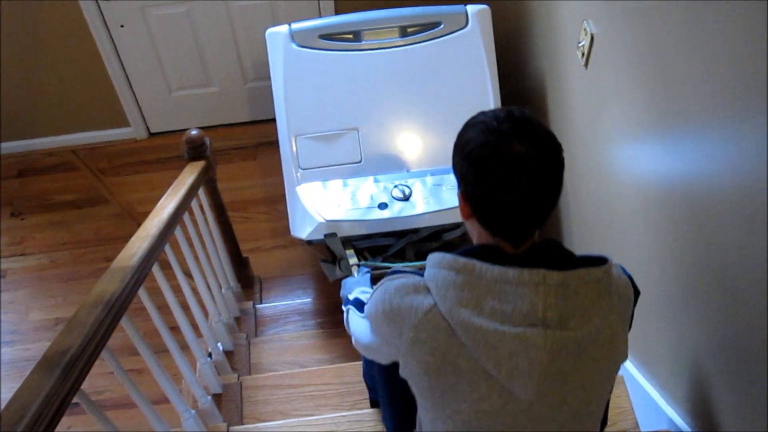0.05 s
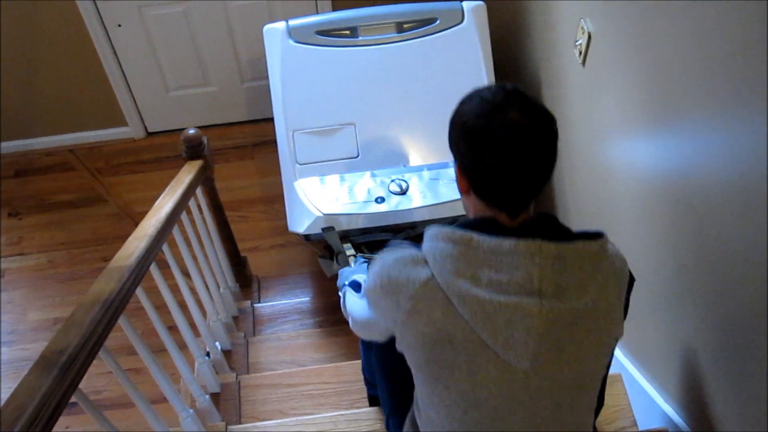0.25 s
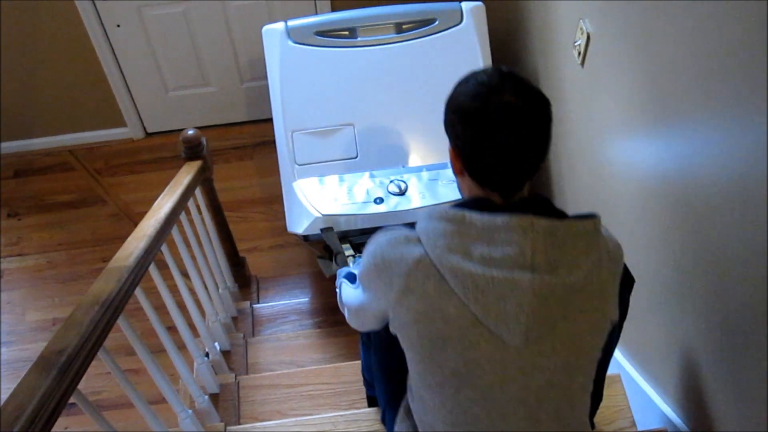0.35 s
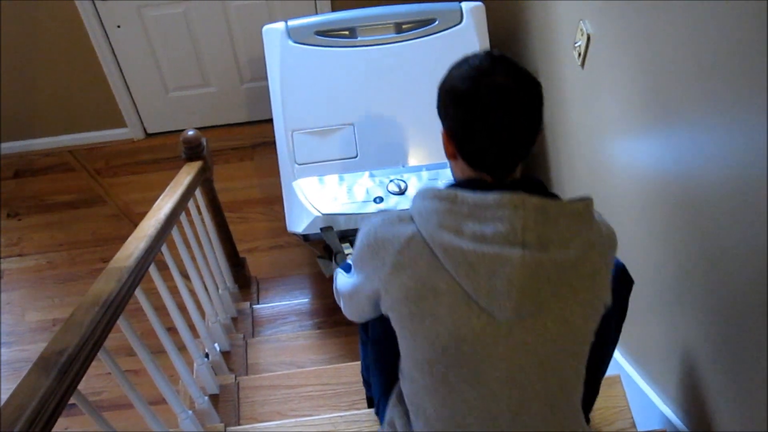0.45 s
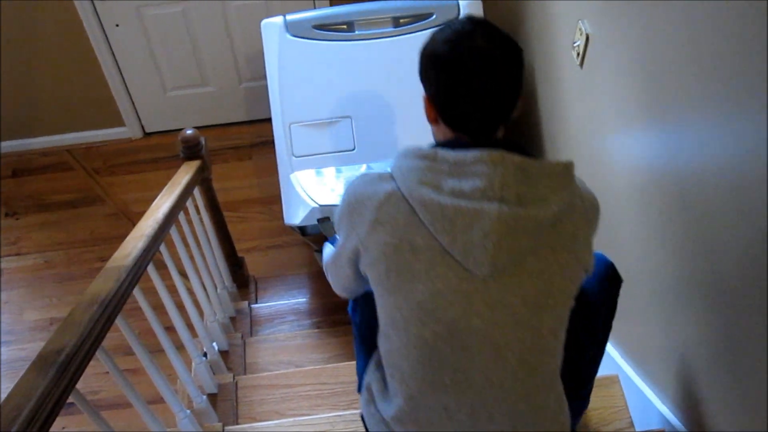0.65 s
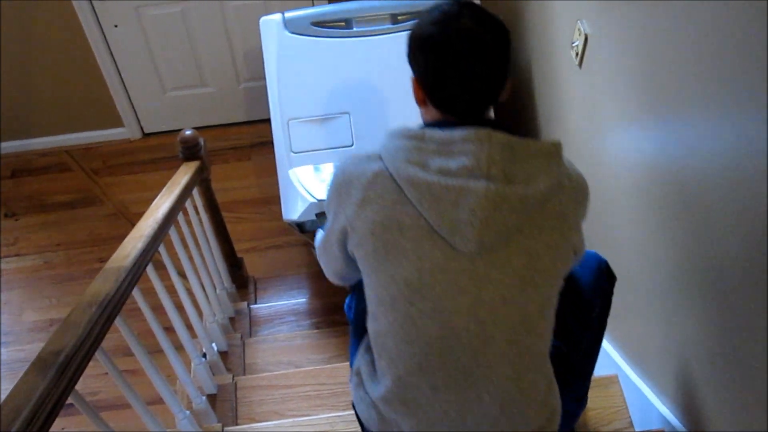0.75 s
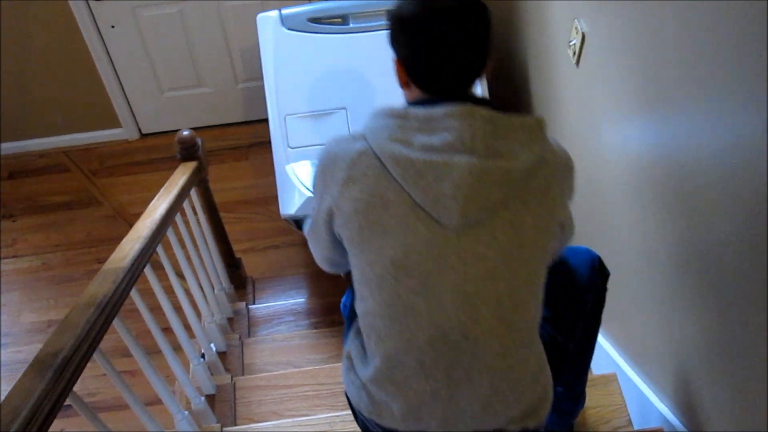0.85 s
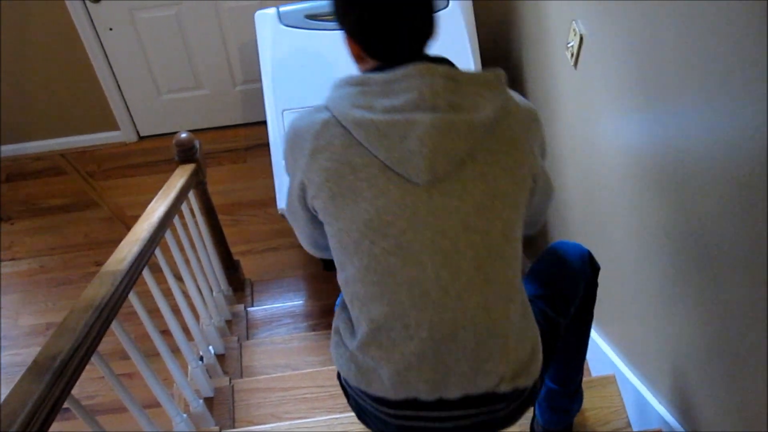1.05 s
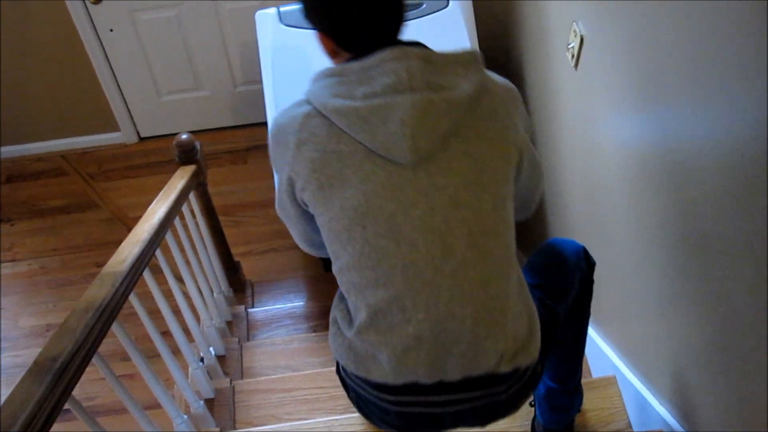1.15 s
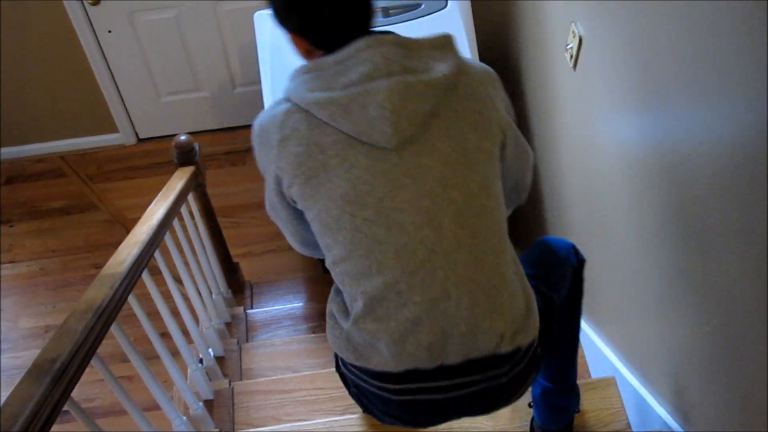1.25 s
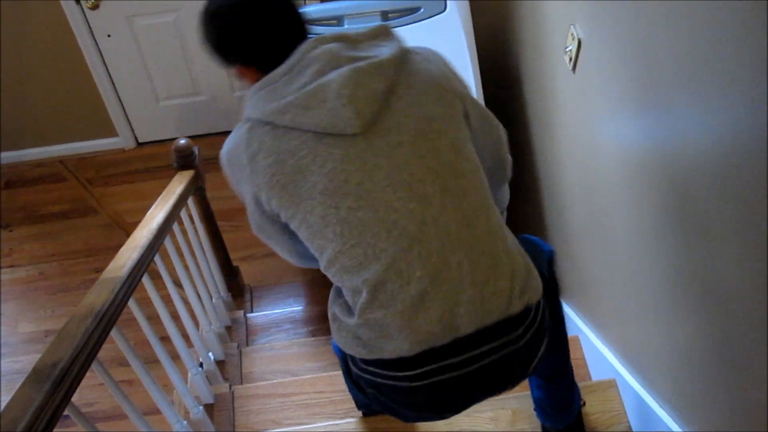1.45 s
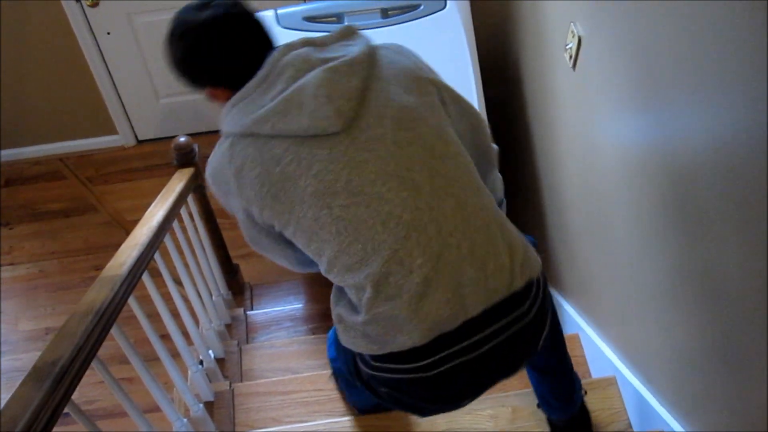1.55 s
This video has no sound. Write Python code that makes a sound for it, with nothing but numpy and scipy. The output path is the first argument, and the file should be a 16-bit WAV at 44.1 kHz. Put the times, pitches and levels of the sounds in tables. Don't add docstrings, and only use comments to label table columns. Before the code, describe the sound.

A heavy metal appliance drops onto a wooden stair with a booming thump and clatter

```python
import sys
import numpy as np
from scipy import signal
from scipy.fft import rfft, irfft
from scipy.io import wavfile

SR = 44100
rng = np.random.default_rng(int(sys.argv[2]) if len(sys.argv) > 2 else 0)


def boost_factor(decibels):
    exponent = np.asarray(decibels, float) / 20
    return 10 ** exponent


def to_wav(s):
    ch = np.atleast_2d(s).T
    pcm = np.round(np.clip(ch, -1, 1) * 32767)
    wavfile.write(sys.argv[1], SR, pcm.astype(np.int16))


N = 70560


def rms_one(x):
    return x / np.sqrt(np.mean(x ** 2) + 1e-20)


def in_time(rows):
    return boost_factor(np.interp(np.arange(N) / SR, *np.transpose(rows)))


def at_hz(points, hz):
    points = np.array(points)
    return np.interp(np.log(hz + 1), np.log(points[:, 0]), points[:, 1])


def butter_filter(x, order, hz, kind="low"):
    return signal.sosfilt(signal.butter(order, hz, kind, fs=SR, output="sos"), x)


def colour(x, spectrum):
    size = 2 ** 17
    hz = np.arange(size // 2 + 1) * SR / size
    slope = 18 * np.minimum(np.log2((hz + 1) / spectrum[0][0]), 0)
    cepstrum = irfft(np.log(boost_factor(at_hz(spectrum, hz) + slope)))
    cepstrum[1:size // 2] *= 2
    cepstrum[size // 2 + 1:] = 0
    return irfft(rfft(x, size) * np.exp(rfft(cepstrum)))[:N]


def drift(rate):
    r = np.exp(-2 * np.pi * rate / SR)
    wander = signal.lfilter([1], [1, -2 * r, r * r], rng.standard_normal(N + SR))
    return rms_one(wander[SR:])


def ring(clicks, hz, t60):
    r = boost_factor(-60 / (t60 * SR))
    w = 2 * np.pi * hz / SR
    return signal.lfilter([0, np.sin(w)], [1, -2 * r * np.cos(w), r * r], clicks + 1e-18)


def fade(starts, t60):
    return signal.lfilter([1], [1, -boost_factor(-60 / (t60 * SR))], starts)


def grains(per_s, spread_db):
    happens = rng.random(N) < per_s / SR
    size = boost_factor(spread_db * np.minimum(rng.exponential(1, N), 4))
    return happens * size * rng.choice([-1, 1], N)


def chatter(column, per_s, t60, soft_hz):
    # start in seconds, tread thud in dB, panel boom in dB, frame clatter in dB.
    blows = np.array([(0.072, -65, -60, -39), (0.2043, -11, -22, -29), (0.2108, -8, -12, -12.5),
                      (0.229, -12.5, -12, -21.5), (0.245, -13, -21, -26), (0.261, -5.5, -18.5, -23.5),
                      (0.282, -13, -15, -28), (0.293, -40, -24.5, -26), (0.31, -25.5, -12, -28.5),
                      (0.339, -17, -18, -33.5), (0.353, -22, -21.5, -38), (0.395, -35, -21, -55),
                      (0.432, -34, -34, -44), (0.469, -48, -22, -50), (0.518, -45, -29, -61),
                      (0.656, -35, -29, -58), (0.699, -46.5, -31.5, -65), (.726, -30, -30.5, -41),
                      (0.753, -46, -41.5, -41.5), (0.939, -33, -44, -66), (.959, -32, -31, -45),
                      (0.986, -37, -40.5, -51), (1.01, -47, -38, -63), (1.069, -48, -47, -54),
                      (1.38, -65, -56, -65), (1.440, -57, -65, -74)])
    rise = 0.0013 * SR
    starts = np.zeros(N)
    starts[(blows[:, 0] * SR).astype(int)] = boost_factor(blows[:, column])
    envelope = fade(starts + 1e-18, t60)
    envelope = signal.lfilter([1 / rise], [1, 1 / rise - 1], envelope)
    touches = (rng.random(N) < per_s / SR) * rng.standard_normal(N) * envelope
    return butter_filter(touches, 2, min(soft_hz, .4 * SR)) / np.sqrt(per_s * t60 / 14 + 1)


def body(force, modes):
    out = 0
    flips = rng.choice([-1, 1], (len(modes), N // 256 + 1))
    flips = np.repeat(flips, 256, axis=1)[:, :N]
    for flip, (hz, db, t60) in zip(flips, modes):
        out = out + boost_factor(db) * ring(force * flip, hz, t60)
    return out


def room_tone():
    # frequency in Hz, level in dB per Hz.
    room = [(30, -14), (66, 0.5), (105, -11), (150, -5), (330, -5.5), (1900, -14), (9000, -28),
            (15500, -34.5)]
    # frequency in Hz, level in dB.
    whine_lines = [(1863, -61.5), (1895, -63), (2439, -63.5), (2466, -72)]
    tick_start_s, ticks_per_s, tick_db, tick_t60_s = .0237, 29.97, -53, .022
    hiss = boost_factor(-47 + 0.77 * drift(4.9)) * rms_one(colour(rng.standard_normal(N), room))
    whine = sum(boost_factor(db) * rms_one(ring(rng.standard_normal(N), hz, 0.41)) for hz, db in whine_lines)
    beats = np.zeros(N)
    times = np.arange(tick_start_s, N / SR - .001, 1 / ticks_per_s)
    beats[(times * SR).astype(int)] = 1
    puffs = fade(beats, tick_t60_s) * rng.standard_normal(N)
    return hiss + whine + boost_factor(tick_db) * butter_filter(puffs, 2, 9500, "high")


def rustle():
    # frequency in Hz, level in dB per Hz.
    cloth = [(1200, -14), (2500, -3), (5000, 2), (11000, -1.5), (15500, -18)]
    # time in seconds, level in dB.
    cloth_level = [(1.0, -72), (1.3, -68), (1.5, -62), (1.56, -52), (1.6, -50)]
    rub = grains(12000, 2.5) * boost_factor(1.5 * drift(20))
    return in_time(cloth_level) * rms_one(colour(rub, cloth))


def drag():
    # frequency in Hz, level in dB per Hz.
    scrape = [(110, -10), (180, -8.5), (290, 0.5), (480, -7.5), (1000, -5.5), (2500, -7), (7300, -21),
              (15000, -43)]
    # time in seconds, level in dB.
    scrape_level = [(0, -34.5), (.1, -38.5), (.19, -38), (.4, -35.5), (.8, -56.5)]
    # frequency in Hz, width in Hz, level in dB.
    truck = [(296, 170, -6), (1030, 260, 5.5), (2610, 130, 6), (3500, 330, 2)]
    rub = grains(9000, 2.5) * boost_factor(.3 * drift(25))
    rings = sum(boost_factor(db) * rms_one(ring(rub, hz, 1.5 / width)) for hz, width, db in truck)
    mix = rms_one(colour(rub, scrape)) + boost_factor(-7.5) * rms_one(rings)
    return in_time(scrape_level) * rms_one(mix)


def stairwell(x):
    # frequency in Hz, time to fall by 60 dB in seconds.
    decay = [(60, 0.53), (170, 0.58), (400, 1.04), (1000, 1.41), (2500, 1.18), (5000, 0.77), (9000, 0.34),
             (14000, 0.36)]
    build_up_s = 0.0057
    t = np.arange(N) / SR
    edges = 35 * 2 ** np.arange(0, 9.1, .5)
    white = rng.standard_normal((2, N))
    echo = 0
    for k, (low, high) in enumerate(zip(edges, edges[1:])):
        t60 = at_hz(decay, np.sqrt(low * high))
        band = butter_filter(white[k % 2], 2, [low, high], "band")
        echo = echo + band * boost_factor(-60 * t / t60) * np.sqrt(14 / t60 / SR)
    return signal.fftconvolve(x, echo * (1 - np.exp(-t / build_up_s)))[:N]


def flicks():
    # start in seconds, level in dB, centre frequency in Hz.
    strap_hits = [
        (.074, -33, 6540),
        (.211, -34.5, 12400),
        (.296, -32, 11000),
        (.727, -47, 8530),
        (.756, -48, 7000),
        (1.105, -41, 3400),
        (1.135, -43, 3470),
        (1.165, -51, 3400),
    ]
    t60_s = .045
    t, out = np.arange(N) / SR, 0
    for s, db, hz in strap_hits:
        age = np.maximum(t - s, 0)
        puff = (t > s) * boost_factor(db - 60 * age / t60_s) * rng.standard_normal(N)
        out = out + butter_filter(puff + 1e-18, 2, [0.55 * hz, min(1.18 * hz, .45 * SR)], "band")
    return out


def tread():
    # frequency in Hz, level in dB, time to fall by 60 dB in seconds.
    wood = [(148, -4, 0.12), (162.8, 0, 0.11), (183.2, -3, 0.12), (226, -3.5, 0.12), (244, -10.5, 0.17),
            (299, -3.5, 0.077)]
    # start in seconds, frequency in Hz, level in dB, time to fall by 60 dB in seconds.
    pushes = [(0.21, 54, -8, .11), (.285, 62, -33, 0.23), (.41, 52, -45, 0.12), (.204, 187, -10.5, .17),
              (0.22, 164, -14, .13), (0.29, 180, -16.5, 0.12), (0.38, 150, -27, 0.24),
              (.262, 420, -14, 0.12), (.305, 500, -15, 0.317), (1.2, 490, -37, 0.073), (.64, 153, -36, 0.2),
              (.96, 141, -27, 0.1), (1.58, 72, -35, 0.35)]
    rise_cycles = 3.1
    t, out = np.arange(N) / SR, 0
    force = chatter(1, per_s=900, t60=0.033, soft_hz=410)
    for k, (hz, db, t60) in enumerate(wood):
        out = out + .5 * (-1) ** k * boost_factor(db) * ring(force, hz, t60)
    out = butter_filter(out, 4, 139, "high")
    for s, hz, db, t60 in pushes:
        age = np.maximum(t - s, 0)
        swell = 1 - np.exp(-age * hz / rise_cycles)
        out = out + boost_factor(db - 60 * age / t60) * swell * np.sin(2 * np.pi * hz * age)
    return out


def appliance():
    # frequency in Hz, level in dB, time to fall by 60 dB in seconds.
    panel_modes = [(400, -2, 0.058), (430, -18, 0.021), (466.3, -4.5, 0.094), (501, -1, 0.072),
                   (554.3, -2.5, 0.082), (629.6, -3.5, 0.055), (681, -7, 0.089), (775, -0.5, 0.021),
                   (887, -8.5, 0.076), (1003.5, -0.5, 0.041), (1077, -0.5, 0.044), (1153, -5.5, 0.063),
                   (1227, -4, 0.054), (1284, 1, 0.016)]
    # frequency in Hz, level in dB, time to fall by 60 dB in seconds.
    frame_modes = [(1890, 3.5, 0.0067), (2138, 3, .02), (2549, 0, 0.043), (2580, -11, 0.057),
                   (3050, -9, 0.031), (3132, 1.5, 0.021), (3530, -23, 0.018), (3870, 5, 0.011),
                   (4090, 6, 0.015), (4640, 4, 0.014), (5283, 2, 0.013)]
    # frequency in Hz, level in dB per Hz.
    crack = [(1400, 0.5), (2900, 4), (4200, -2), (6500, -5), (9000, -10), (12000, -21.5), (15500, -24)]
    panel_force = chatter(2, per_s=3000, t60=0.085, soft_hz=2130)
    frame_force = chatter(3, per_s=14000, t60=0.094, soft_hz=10200)
    broad = butter_filter(panel_force, 2, [300, 1500], "band")
    panels = 0.46 * body(panel_force, panel_modes) + boost_factor(28) * broad
    frame = 0.42 * body(frame_force, frame_modes) + boost_factor(26.7) * colour(frame_force, crack)
    return panels + frame


def scene():
    load, thud = appliance() + flicks(), tread()
    echo = stairwell(boost_factor(-0.5) * load + boost_factor(-9) * thud)
    return (load + thud + echo + drag() + rustle() + room_tone())[None, :]


def top_cut(x):
    return signal.sosfilt(signal.butter(12, 15700, fs=SR, output="sos"), x)


def record(dry):
    mix = 0.83 * np.tanh(dry / 0.78)
    return top_cut(mix)


dry = scene()
out = record(dry)
to_wav(out)
```